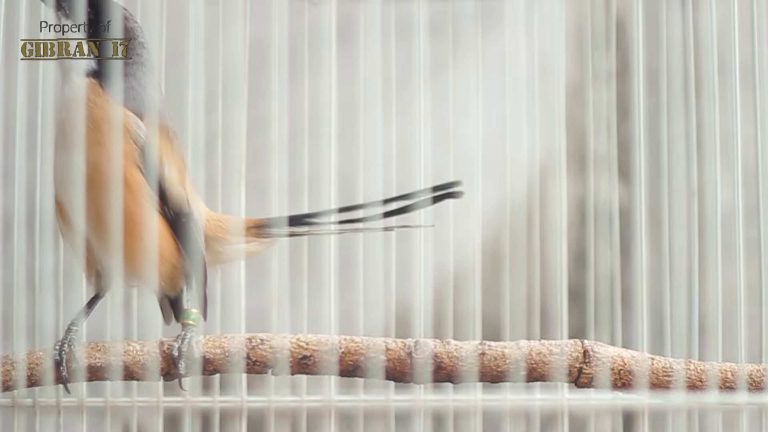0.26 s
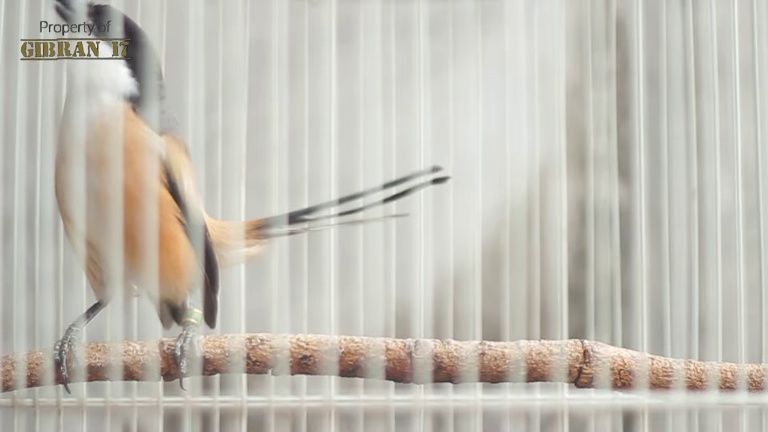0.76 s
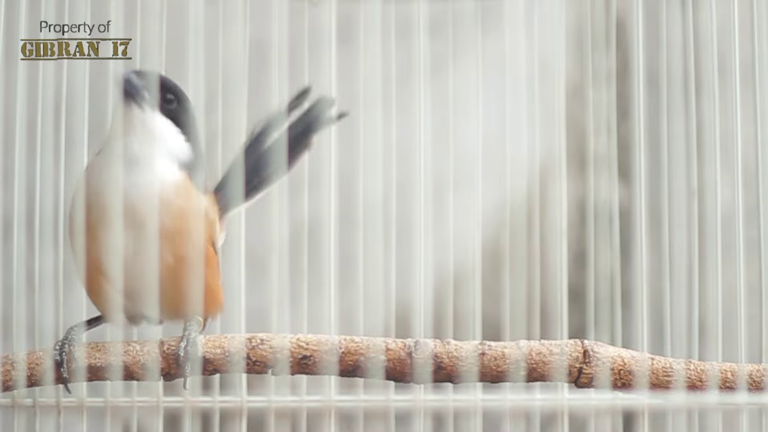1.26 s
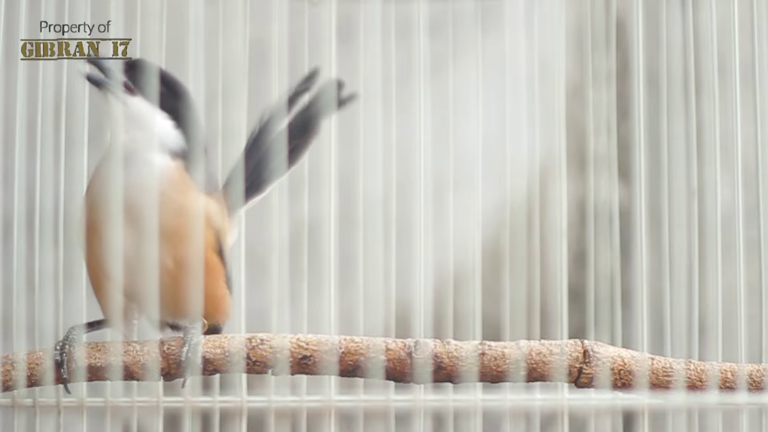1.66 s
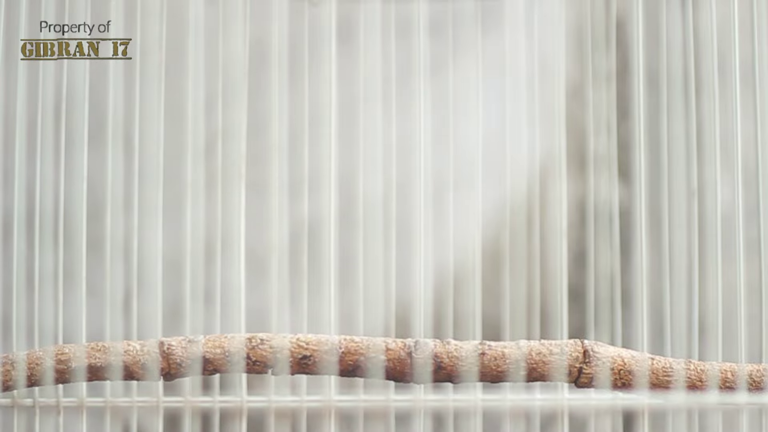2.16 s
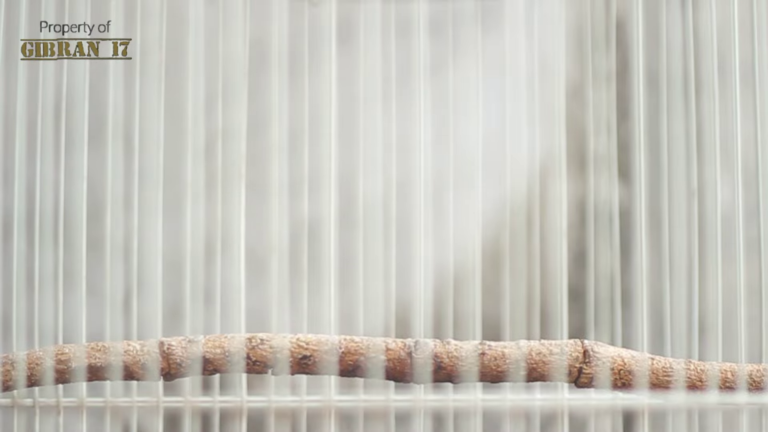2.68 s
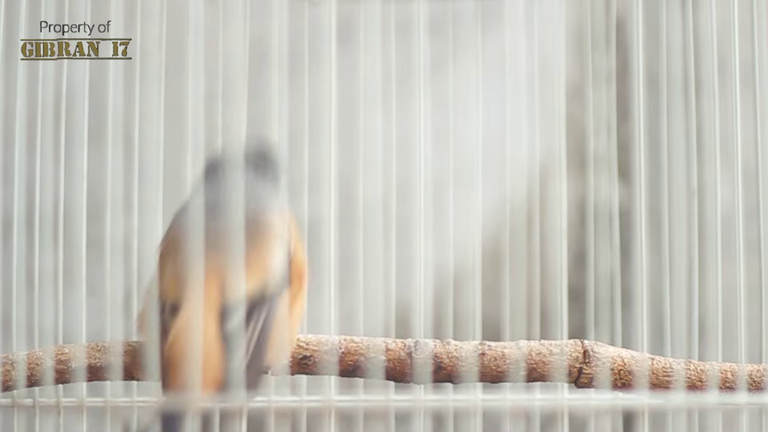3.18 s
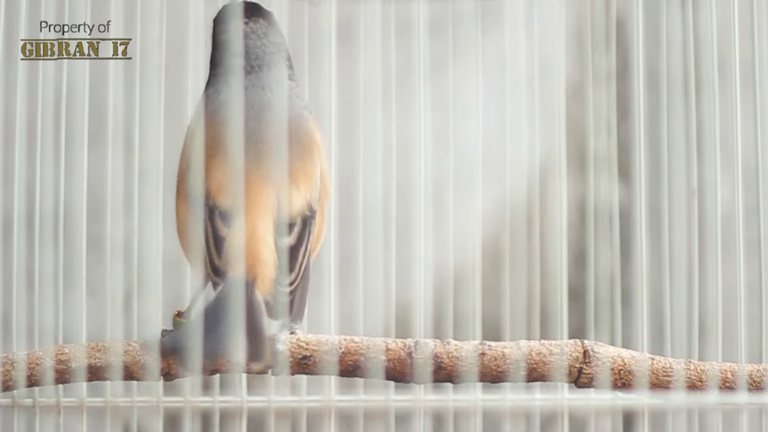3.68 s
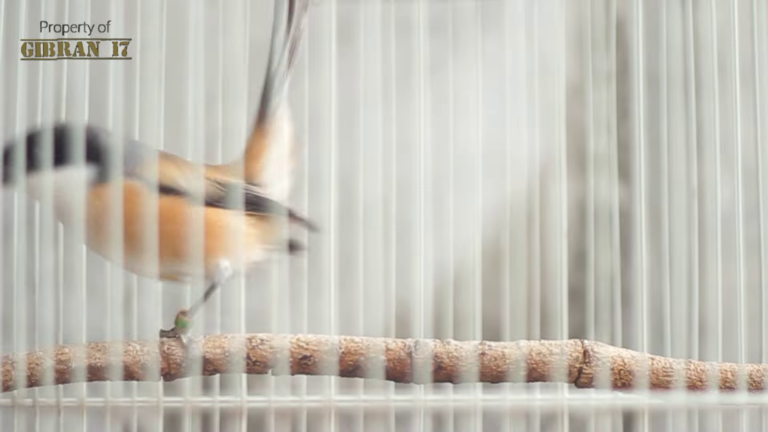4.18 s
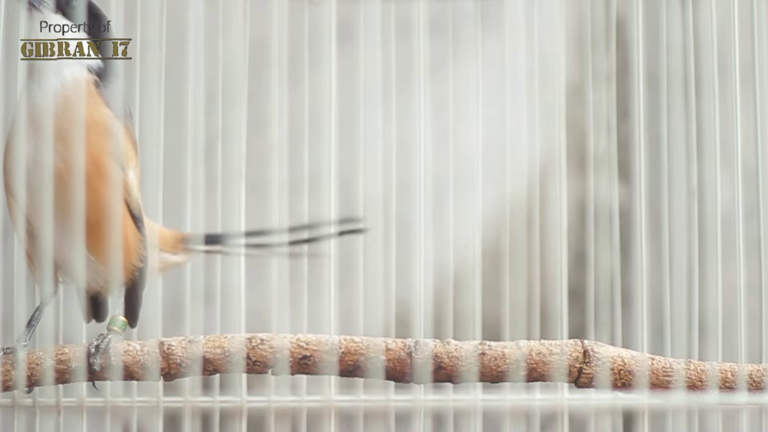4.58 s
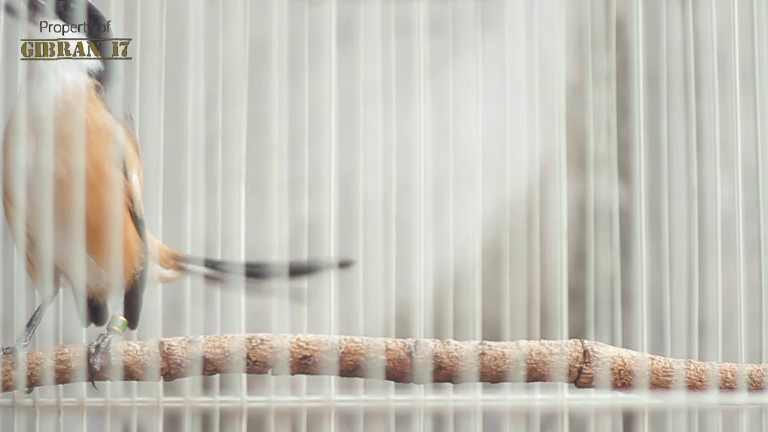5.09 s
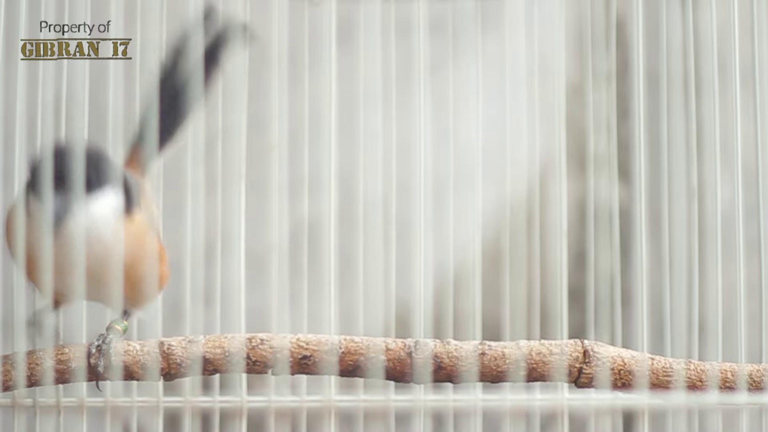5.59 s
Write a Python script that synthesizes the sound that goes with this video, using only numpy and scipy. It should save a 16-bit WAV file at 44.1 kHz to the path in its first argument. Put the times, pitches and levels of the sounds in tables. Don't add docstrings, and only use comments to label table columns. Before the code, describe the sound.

A close, loud caged bird calls in a lively hard-walled room. Each call is a tiny rising whistle followed by rapid falling notes, about one call per second. Between calls, claws scrabble and knock on a wooden perch with light feather rustle and a faint wire ring. Later calls shorten to a single fall. Very faint street air, traffic and another bird lie behind; the loudest notes clip the microphone.

```python
import sys
import numpy as np
from scipy import signal
from scipy.io import wavfile

SR = 44100
rng = np.random.default_rng(int(sys.argv[2]) if len(sys.argv) > 2 else 0)


def file_out(sig):
    cols = np.atleast_2d(sig).T
    lim = np.clip(cols, -1, 1)
    pcm = np.round(lim * 32767).astype(np.int16)
    wavfile.write(sys.argv[1], SR, pcm)


def how_loud(loudness_db):
    steps = np.asarray(loudness_db, float) / 20
    return 10 ** steps


N = 257544
LEAD_IN = round(.4 * SR)


def rms_one(x):
    return x / np.sqrt(np.mean(x ** 2) + 1e-20)


def at_hz(points, hz):
    table_hz, values = np.transpose(points)
    return np.interp(np.log(hz), np.log(table_hz), values)


def band(x, low_hz, high_hz):
    return signal.sosfilt(signal.butter(2, [low_hz, high_hz], "band", fs=SR, output="sos"), x)


def drift(rate_hz, size):
    r = np.exp(-2 * np.pi * rate_hz / SR)
    noise = rng.standard_normal(size + SR)
    return rms_one(signal.lfilter([1], [1, -2 * r, r * r], noise)[SR:])


def ring(x, hz, t60):
    r = how_loud(-60 / (t60 * SR))
    w = 2 * np.pi * hz / SR
    return signal.lfilter([0, np.sin(w)], [1, -2 * r * np.cos(w), r * r], x + 1e-18)


def add(track, s, sound):
    at = LEAD_IN + round(s * SR)
    track[at:at + len(sound)] += sound[:len(track) - at]


def voice(notes, partials_db, glide, bend, flick, swell, fade, wobble, flutter_db, rasp_db):
    # t/s, second partial/dB, higher partials/dB, rasp/dB
    beak = [(-.4, 2.5, -0.5, 9), (.45, -6.5, -9.5, 0), (.535, 2, -9.5, 1), (1.45, -10.5, -4, -2),
            (1.53, 1, 0, -0.5), (2.4, -9.5, -13, 1), (2.49, -1.5, 4.5, -1.5), (3.25, -8, -8, 4.5),
            (3.32, -2, 2, 2), (4.35, -1, 0.5, -7), (4.43, 2, 0.5, 7), (5.1, 0, 3.5, -5),
            (5.145, 5.5, 6, -9.5), (5.5, 10, 10, -2), (5.565, -4.5, -11, -8)]
    # f/Hz, level/dB
    throat = [(2200, -20), (3200, 0.5), (4300, 0.5), (5600, 1.5), (7000, -2), (8400, 4.5), (9600, -7),
              (11200, 6), (13000, 9.5), (14500, -8)]
    clear, rough = np.zeros((2, LEAD_IN + N))
    unsteady = 1 + wobble * drift(250, size=len(clear))
    for s, length, start_hz, held_hz, end_hz, level_db in notes:
        second_db, higher_db, turn_db = [row for row in beak if row[0] <= s][-1][1:]
        t = np.arange(round(length * SR)) / SR
        leaving = np.exp((t - length) / flick)
        hz = held_hz + (start_hz - held_hz) * np.exp(-(t / glide) ** bend) + (end_hz - held_hz) * leaving
        phase = 2 * np.pi * np.cumsum(hz * unsteady[LEAD_IN + round(s * SR):][:len(t)]) / SR
        aimed_db = np.array(partials_db) + ([0, second_db] + 3 * [higher_db])[:len(partials_db)]
        closing_db = -14 * leaving
        tone = 0
        for k, db in enumerate(aimed_db, start=1):
            level = how_loud(db + at_hz(throat, k * hz) + (k > 1) * closing_db)
            tone = tone + level * np.sin(k * phase) * (k * hz < SR / 2)
        breath = how_loud(level_db) * (1 - np.exp(-(t / swell) ** 2)) * (1 - np.exp((t - length) / fade))
        add(clear, s, breath * tone)
        add(rough, s, breath * how_loud(turn_db + rasp_db))
    rasp = band(rough * rng.standard_normal(len(rough)), 8000, 21000)
    return clear * how_loud(flutter_db * drift(120, size=len(clear))) + rasp


def tiring(rows, top_hz, top_sag_hz, flick_hz, flick_sag_hz):
    notes = []
    for s, length, hz, db in rows:
        done = sum(0 < s - other[0] < .15 for other in rows)
        notes.append((s, length, top_hz - done * top_sag_hz, hz, hz + flick_hz - done * flick_sag_hz, db))
    return notes


def flicked(rows, flick_hz):
    return [(s, length, start_hz, hz, hz + flick_hz, db) for s, length, start_hz, hz, db in rows]


def rising_whistles():
    # t/s, length/s, held f/Hz, landing f/Hz, level/dB
    rising = [(-.34, .017, 3200, 4600, 5), (.500, 0.019, 3020, 4650, -8.5), (1.492, 0.02, 3233, 5180, -3),
              (2.449, 0.018, 3335, 4660, -3), (3.283, .023, 3170, 4937, -6.5),
              (4.395, 0.024, 3467, 4705, -4.5), (5.1158, .0205, 3174, 4440, -5),
              (5.537, 0.014, 3258, 4320, -7)]
    partials = [-2.5, -10, -23.5, -42, -47]
    rises, landings = [], []
    for s, length, hz, top_hz, db in rising:
        start_hz = 3060 - .8 * max(hz - 3200, 0)
        end_hz = hz + .85 * (top_hz - hz)
        rises.append((s, length, start_hz, hz, end_hz, db))
        landings.append((s + length - 0.0016, 0.0064, end_hz, top_hz, top_hz, db - 3))
    return (voice(rises, partials, glide=.006, bend=1.2, flick=0.0028, swell=0.0056, fade=0.0004,
                  wobble=.004, flutter_db=1.1, rasp_db=-25.0)
            + voice(landings, [0, -30], glide=0.00094, bend=1.2, flick=0.002, swell=0.00027, fade=0.0039,
                    wobble=0.021, flutter_db=8.0, rasp_db=-30.5))


def lead_ins():
    # t/s, length/s, start f/Hz, held f/Hz, level/dB
    leaps = [(.493, 0.018, 2530, 4310, -11), (1.487, 0.023, 2455, 4350, -11),
             (2.443, 0.017, 2707, 4430, -9), (3.276, 0.022, 2635, 4295, -10.5),
             (4.3925, 0.0056, 2816, 2950, -20), (5.1135, .006, 2990, 3050, -19),
             (5.5345, 0.0079, 2700, 2610, -16), (5.536, .007, 4920, 5330, -12)]
    partials = [-1.5, -18, -37]
    return voice(flicked(leaps, 70), partials, glide=.0095, bend=6.5, flick=0.0072, swell=0.0047, fade=0.001,
                 wobble=0.0086, flutter_db=0.5, rasp_db=-36.5)


def falling_whistles():
    # t/s, length/s, held f/Hz, level/dB
    falling = [(-.29, .030, 4166, 15), (-.24, .012, 4484, -6.5), (.545, 0.032, 4150, -2.5),
               (.598, 0.03, 4170, -3.5), (.648, 0.027, 4335, -14.5), (1.541, 0.029, 4185, -0.5),
               (1.593, 0.032, 4240, -2.5), (1.641, 0.021, 4360, -8.5), (2.498, .027, 4212, 1),
               (2.549, .022, 4280, 0.5), (2.597, 0.033, 4290, -19.5), (3.331, .034, 4226, -1),
               (3.389, 0.03, 4290, -2.5), (3.439, 0.0207, 4255, -10.5)]
    # t/s, length/s, held f/Hz, level/dB
    late = [(4.438, 0.03, 4144, -3), (5.154, 0.032, 4100, -9)]
    partials = [0, -22, -44]
    last = (5.576, .017, 6479.5, 4173, -6.5)
    falls = tiring(falling, top_hz=6124, top_sag_hz=200, flick_hz=586, flick_sag_hz=249.6) + flicked([last], 0)
    late_falls = tiring(late, top_hz=7250, top_sag_hz=0, flick_hz=100.8, flick_sag_hz=0)
    return (voice(falls, partials, glide=.0065, bend=1.5, flick=0.0033, swell=0.0064, fade=0.0054,
                  wobble=.012, flutter_db=1.0, rasp_db=-22)
            + voice(late_falls, partials, glide=.0095, bend=1.7, flick=0.0023, swell=0.0071, fade=0.0038,
                    wobble=0.0061, flutter_db=3.5, rasp_db=-23))


def upper_falls():
    # t/s, length/s, held f/Hz, level/dB
    high = [(.542, 0.039, 5600, -19.5), (.595, 0.019, 5600, -18.5), (1.538, 0.039, 5700, -16),
            (1.590, .016, 5700, -14.5), (2.495, .028, 5600, -17.5), (2.546, 0.022, 5600, -16.5),
            (3.328, .034, 5400, -17), (3.385, 0.035, 5500, -20.5)]
    # t/s, start f/Hz, level/dB
    sliding = [(4.446, 6360, -6), (5.158, 6676, -4.5)]
    partials = [-2, -16]
    last = (5.5755, .011, 6440, 5410, 3.5)
    upper = tiring(high, top_hz=7060, top_sag_hz=420, flick_hz=90, flick_sag_hz=0) + flicked([last], -292)
    slides = [(s, .0235, hz, 5890, 4360, db) for s, hz, db in sliding]
    return (voice(upper, partials, glide=.008, bend=1.7, flick=0.0054, swell=0.0028, fade=0.0033,
                  wobble=0.014, flutter_db=5.0, rasp_db=-15.0)
            + voice(slides, [0, -24], glide=0.0042, bend=1.8, flick=0.019, swell=0.001, fade=0.0023,
                    wobble=.015, flutter_db=2.5, rasp_db=-22.5))


def hops():
    # t/s, scratch/dB, weight on the perch/dB, feather rustle/dB
    contacts = [(1.0605, -40.5, -47, -58), (1.3193, -48, -35.5, -65.5), (1.347, -37, -37.5, -60.5),
                (1.7526, -30, -41, -48), (1.778, -53, -45, -55.5), (1.7916, -51, -55.5, -44),
                (1.894, -34, -50, -35), (1.9054, -27, -46, -38), (1.9215, -26, -35, -32),
                (1.9449, -29.5, -41.5, -53), (1.9836, -32.5, -37.5, -52), (3.0007, -30.5, -52, -37.5),
                (3.0146, -32.5, -49, -51), (3.1174, -33, -47, -42.5), (3.128, -26.5, -36.5, -42),
                (3.1511, -33, -40.5, -46), (3.175, -35.5, -45, -58), (4.201, -35.5, -58.5, -39.5),
                (4.262, -39, -42, -45), (4.2823, -32.5, -37, -35.5), (4.2972, -33.5, -45, -40.5),
                (4.3244, -35, -39, -54), (5.234, -34, -40, -37), (5.645, -35, -33.5, -41),
                (5.672, -22, -30, -50), (5.696, -31.5, -38, -50), (5.7145, -30, -42, -49),
                (5.8024, -50, -55, -43)]
    # t/s, level/dB
    wire_ticks = [(1.89, -51), (2.996, -41)]
    # f/Hz, level/dB, t60/s
    perch = [(747, 5.5, 0.023), (901, 11.5, 0.024), (1168, 1.5, 0.052), (530, -2, 0.052)]
    # f/Hz, level/dB, t60/s
    cage_wires = [(7080, -4, .22), (8900, -6, .12), (9080, -7, .14), (12500, -8, .1), (13050, -2, .13),
                  (15300, -7, .1), (5200, -7, .1), (2020, -6, .25)]
    length = 0.008
    scratch, knock, rustle, tick = np.zeros((4, LEAD_IN + N))
    shape = (len(contacts), 2000)
    grit = rng.standard_normal(shape) * rng.exponential(1, shape) ** 0.2
    t = np.arange(2000) / SR
    for (s, scratch_db, perch_db, rustle_db), noise in zip(contacts, grit):
        centre_hz = np.clip(1910 + 35 * (scratch_db - perch_db), 800, 4000)
        burst = noise * np.exp(-t / length) * np.minimum(t / (0.71 * length), 1)
        add(scratch, s, how_loud(scratch_db + 6) * band(burst, centre_hz / 1.8, centre_hz * 2.32))
        add(knock, s, how_loud(perch_db - 28) * burst)
        add(rustle, s, how_loud(rustle_db + 6.0) * burst)
    for s, db in wire_ticks:
        add(tick, s, how_loud(db) * np.ones(1))
    wood = sum(how_loud(db) * ring(knock, hz, t60) for hz, db, t60 in perch)
    wires = sum(how_loud(db) * ring(tick, hz, t60) for hz, db, t60 in cage_wires)
    return scratch + wood + band(rustle, 3800, 15000) + wires


def room(x, wet_db, build, late_db, late_stretch, echo_db):
    # f/Hz, t60/s
    room_t60 = [(500, 0.94), (2000, 0.68), (3200, 0.21), (4300, 0.46), (5600, 0.32), (8500, 0.28),
                (13000, 0.25)]
    # delay/s, level/dB
    echoes = [(.0035, -11), (.0075, -10), (.0125, -11), (.019, -13), (.027, -13)]
    t = np.arange(round(.9 * SR)) / SR
    white = rng.standard_normal((2, len(t)))
    edges = 200 * 2 ** np.arange(0, 6.6, .5)
    tail = 0
    for k, (low, high) in enumerate(zip(edges, edges[1:])):
        fall_db = -60 * t / at_hz(room_t60, np.sqrt(low * high))
        next_door = how_loud(late_db + fall_db / late_stretch)
        tail = tail + band(white[k % 2], low, high) * (how_loud(fall_db) + next_door)
    response = how_loud(wet_db) * tail * (1 - np.exp(-t / build)) / np.sqrt(np.sum(tail ** 2))
    response[0] += 1
    smear = rng.standard_normal((len(echoes), 120)) * np.exp(-np.arange(120) / 35)
    for (s, db), echo in zip(echoes, smear):
        response[round(s * SR):][:120] += how_loud(db + echo_db) * echo / np.sqrt(np.sum(echo ** 2))
    return signal.fftconvolve(x, response)[LEAD_IN:LEAD_IN + N]


def far_bird():
    # t/s, length/s, held f/Hz, level/dB
    whistles = [(.41, 0.089, 3880, -67), (2.90, 0.06, 2530, -44), (4.83, 0.13, 2450, -47.5)]
    notes = [(s, length, 1.04 * hz, hz, hz, db) for s, length, hz, db in whistles]
    return voice(notes, [0], glide=0.047, bend=1.0, flick=.02, swell=0.016, fade=0.024,
                 wobble=0.037, flutter_db=9.5, rasp_db=-46.5)


def drone():
    # t/s, f/Hz, level/dB
    engine = [(3.361, 352.2, -70), (3.552, 394.5, -46.5), (3.66, 441.3, -46), (3.71, 441.3, -72),
              (3.8, 384, -53), (3.97, 360, -55), (4.12, 312.2, -49), (4.279, 320.6, -49), (4.46, 366, -65)]
    s, hz, db = np.transpose(engine)
    t = np.arange(N) / SR
    phase = 2 * np.pi * np.cumsum(np.interp(t, s, hz) * (1 + 0.015 * drift(9.8, size=N))) / SR
    level_db = np.interp(t, s, db, left=-99, right=-99) - 0.5 + 2.1 * drift(19, size=N)
    return how_loud(level_db) * np.sin(phase)


def ambience(patchy_db):
    # t/s, level/dB
    air_levels = [(0, -48), (.9, -48), (3.4, -47.5), (4.9, -47.5), (5.84, -46.5)]
    # f/Hz, level/dB per Hz
    colour = [(15, -49), (25, -21), (86, -6), (118, -14), (202, -1), (271, -5.5), (301, -5), (450, -7.5),
              (769, -9), (1760, -15.5), (3260, -20), (3630, -16.5), (4870, -25.5), (15000, -34)]
    # closest t/s, half-width/s, level/dB
    passes = [(.85, .2, -39.5), (2.55, 0.3, -38.5), (3.2, .2, -35), (3.7, 0.22, -36), (4.15, 0.22, -36),
              (5.6, .5, -38.5)]
    s, air_db = np.transpose(air_levels)
    t = np.arange(N) / SR
    white = rng.standard_normal((3, N))
    edges = 26 * 2 ** np.arange(0, 9.7, .5)
    flicker = [drift(13.0, size=N) for k in range(4)]
    air = 0
    for k, (low, high) in enumerate(zip(edges, edges[1:])):
        level_db = at_hz(colour, np.sqrt(low * high)) + patchy_db * flicker[k % 4]
        air = air + band(white[k % 2], low, high) * how_loud(level_db)
    swells = sum(how_loud(db) * np.exp(-((t - closest) / width) ** 2) for closest, width, db in passes)
    traffic = rms_one(band(white[2], 330, 480)) * how_loud(-16.5 + 0.83 * flicker[1]) * swells
    hum_hz, hum_width_hz = 147.9, 5.4
    hum = rms_one(band(white[2], hum_hz - hum_width_hz / 2, hum_hz + hum_width_hz / 2))
    return rms_one(air) * how_loud(np.interp(t, s, air_db)) + traffic + how_loud(-59) * hum


def scene():
    # from t/s, tail/dB, wall echoes/dB
    places = [(-.4, -2.5, -4.5), (1.2, -5.5, 0), (2.2, -4, -1), (3.2, -5.5, 2.5), (4.1, -5.5, -1),
              (5.0, -6.5, -1), (5.45, -7.5, -1.5)]
    song = rising_whistles() + lead_ins() + falling_whistles() + upper_falls()
    cage = song + hops() + far_bird()
    t = np.arange(-LEAD_IN, N) / SR
    place = np.searchsorted(np.array(places)[1:, 0], t)
    wet = 0
    for k, (s, wet_db, echo_db) in enumerate(places):
        wet = wet + room(cage * (place == k), wet_db, build=0.0022, late_db=-16.0, late_stretch=2.19,
                         echo_db=echo_db)
    return (wet + ambience(patchy_db=1.1) + drone())[None]


def top_cut(x):
    return signal.sosfilt(signal.butter(12, 17110, fs=SR, output="sos"), x)


def record(dry):
    overloaded = np.clip(dry, -1.05, 1.06)
    cut = signal.sosfilt(signal.ellip(10, .3, 55, 15850, fs=SR, output="sos"), overloaded)
    mix = np.clip(cut, -.99, .995) + .0014
    return top_cut(mix)


dry = scene()
out = record(dry)
file_out(out)
```